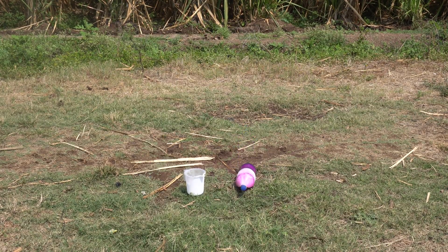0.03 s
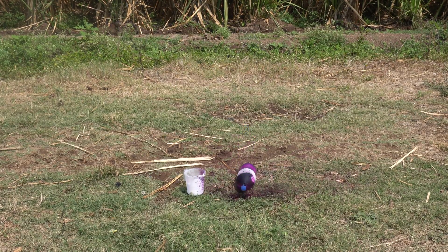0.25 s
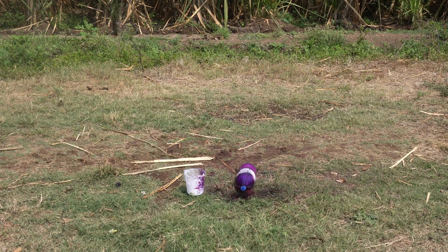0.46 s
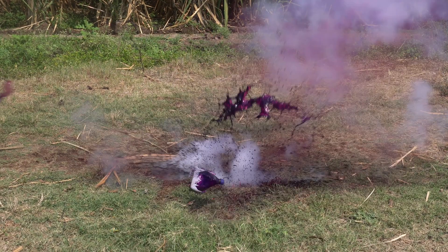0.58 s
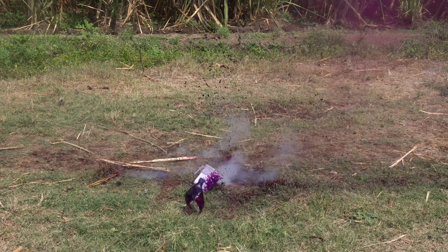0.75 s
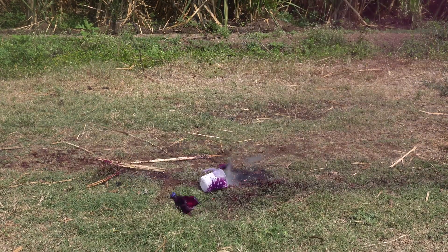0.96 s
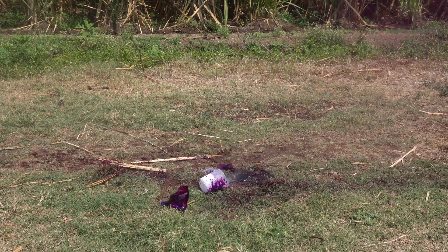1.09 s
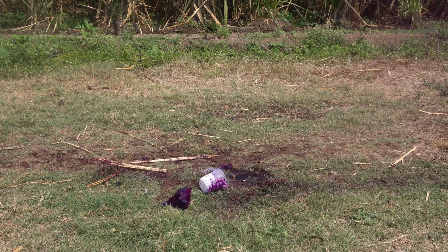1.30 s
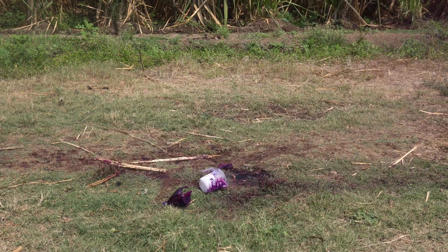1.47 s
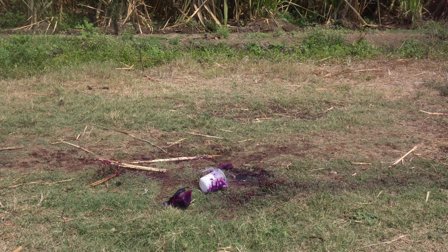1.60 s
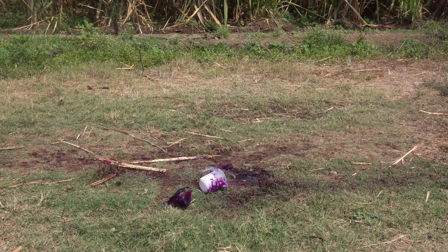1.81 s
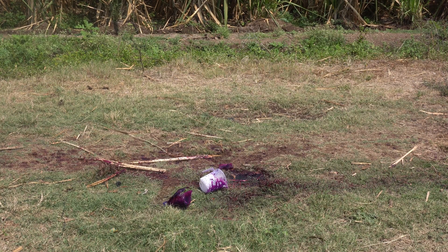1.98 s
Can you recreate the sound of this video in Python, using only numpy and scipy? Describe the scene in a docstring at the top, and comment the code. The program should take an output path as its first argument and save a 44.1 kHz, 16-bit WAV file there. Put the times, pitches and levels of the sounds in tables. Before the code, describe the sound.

Gas hisses, then a pressurized bottle explodes with a loud bang and boom in a field.

```python
"""A bottle under gas pressure lies on grass in an open field, one microphone close by.
It spits and leaks at the neck, pops, vents in a jet and then bursts. The bang overloads the
microphone, spray hisses out and echoes come back from the tall crop behind. Drops patter
on the dry grass and pieces thud down. A light wind rumbles on the microphone throughout."""
import sys
import numpy as np
from scipy import signal
from scipy.fft import rfft, irfft
from scipy.io import wavfile

SR = 44100
rng = np.random.default_rng(int(sys.argv[2]) if len(sys.argv) > 2 else 0)


def int16_out(signal):
    """Quantize to a 16-bit WAV file."""
    q = np.round(np.clip(np.atleast_2d(signal).T, -1, 1) * 32767)
    wavfile.write(sys.argv[1], SR, q.astype(np.int16))


N = 90404
TIME = np.arange(N) / SR
POP_S, BURST_S, CUTOFF_HZ = .1008, .6083, 15500

# Every _SPECTRUM is the shape of a noise: f/Hz, level/dB
# gas seeping at the neck: t/s, level/dB
LEAK_LEVEL = [(0, -55), (.04, -53), (.09, -48), (.115, -33), (.15, -37.5), (.2, -41.5), (.44, -33.5),
              (.5, -36.5), (.595, -35)]
LEAK_SPECTRUM = [(150, -6), (600, 3.5), (1800, 5), (4500, 3), (8000, -1), (15000, -3.5)]
# liquid spitting at the neck: t/s, level/dB, attack/s, hold/s, decay/s
NECK_SPITS = [(0, -38, 0.0016, 0.014, 0.037), (.0475, -29.5, 0.00053, 0.00091, 0.002),
              (.176, -34, 0.0094, .002, .004)]
SPIT_SPECTRUM = [(800, -23), (4200, 5), (6500, -5), (9000, 3), (11000, 2.5), (15000, -2)]
# hollow knock of the seal giving: f/Hz, level/dB, decay/s
SEAL_MODES = [(151, -23, 0.0025), (427, -17, 0.0034), (540, -26, 0.003), (1020, -12, 0.0012),
              (1500, -18, 0.0033)]
# gusts of gas from the neck: t/s, level/dB, attack/s, hold/s, decay/s
GAS_SPURTS = [(.1, -23.5, 0.00031, 0.0057, 0.0043), (.212, -16.5, 0.003, 0.0068, 0.018),
              (.411, -16.5, 0.0053, 0.0076, 0.0019), (.434, -24.5, 0.0018, 0.003, 0.0039)]
JET_SPECTRUM = [(40, -4), (170, -4), (400, -1), (700, -3), (1300, -0.5), (3000, -2), (5500, -7),
                (8500, -10), (15000, -14.5)]
TURBULENCE_SPECTRUM = [(25, 0), (70, -6.5), (170, 1.5), (300, -7.5), (700, -45)]
# slow pushes of air at the microphone: t/s, level/dB, f/Hz, decay/s
AIR_PUSHES = [(0.103, -27, 45, .006), (0.162, -25, 34.6, 0.029), (0.418, -18.5, 50, 0.014),
              (0.656, -4.5, 35.4, 0.03)]

# ringing of the burst bottle: f/Hz, level/dB, decay/s
BOTTLE_MODES = [(597.6, 14, 0.011), (478.4, 9.5, .011), (365.4, 4, 0.014), (724, 11.5, 0.0059)]
CRACK_SPECTRUM = [(100, -6.5), (550, 30), (900, 4), (5000, -0.5), (15000, -8)]
BANG_HISS_SPECTRUM = [(300, 6), (1000, 16), (3000, 25), (8000, -33), (15000, -21)]
GUSH_SPECTRUM = [(100, -23.5), (400, -6), (640, 0.5), (850, -9), (3000, -28), (8000, -62)]
BOOM_SPECTRUM = [(20, -9), (45, -11), (110, -24), (210, 4.5), (300, -4.5), (420, -1), (600, -8),
                 (1200, -42), (3000, -57.5)]
# cloud of spray: t/s, level/dB, attack/s, hold/s, decay/s
SPRAY_SWELLS = [(.641, -4, 0.0064, 0.01, 0.032), (.68, -16.5, 0.019, .12, 0.051)]
SPRAY_SPECTRUM = [(300, -0.5), (1200, 9), (3000, 0), (7500, -0.5), (10000, -4.5), (15000, -19.5)]

# returns from field and crop: t/s, level/dB, attack/s, hold/s, decay at 400 Hz/s
CROP_ECHOES = [(.612, -11, 0.0086, 0.15, 0.096), (.785, -10, 0.015, 0.042, 0.077)]
ECHO_SPECTRUM = [(40, -42), (85, -26), (125, -10.5), (195, 1.5), (300, -4.5), (420, -0.5), (1100, -10),
                 (2200, -23), (5000, -48), (15000, -55)]
# sharper echoes from the far edges of the field: t/s, level/dB, attack/s, hold/s, decay/s
EDGE_SLAPS = [(.818, -14.5, 0.0042, .002, 0.0096), (.992, -24, 0.012, 0.005, 0.043),
              (1.062, -29.5, 0.0067, 0.016, 0.061)]
SLAP_SPECTRUM = [(100, -1), (450, 10.5), (1300, -2), (5000, -14.5), (8000, -17), (15000, -54)]
ROLL_SPECTRUM = [(50, -3), (130, 5), (300, -7.5), (600, -11), (1300, -16.5), (3000, -27), (8000, -32.5),
                 (15000, -51)]

# large drops on dry grass: t/s, level/dB, top treble/dB
LARGE_DROPS = [(1.1253, -22, -10), (1.219, -37.5, 8), (1.258, -37.5, 5), (1.2875, -28.5, -4),
               (1.3198, -29, -5), (1.326, -32.5, -4), (1.4287, -40, 6), (1.5063, -30.5, 1),
               (1.577, -35.5, -1), (1.596, -38.5, -16), (1.6399, -33, 10), (1.6503, -39, 4),
               (1.671, -34, -12), (1.7012, -34.5, -16), (1.8356, -27.5, -3), (1.851, -33.5, -2),
               (1.888, -33.5, 1), (1.944, -32.5, 3)]
# base strength of the small drops: t/s, level/dB
PATTER_LEVEL = [(.8, -29.5), (1.3, -43), (1.47, -46.5), (1.9, -48), (2.05, -56)]
DROP_SPECTRUM = [(800, 6), (3000, -10.5), (7500, 4.5), (11000, -1), (15000, -3.5)]
# heavy pieces landing: t/s, level/dB, f/Hz, decay/s, scuff level/dB, scuff decay/s
PIECE_THUDS = [(1.288, -24.5, 109, 0.0057, -33, 0.049), (1.393, -20, 111, 0.008, -38, 0.0083),
               (1.442, -30, 533, 0.0073, -55, 0.0092), (1.494, -26, 120, 0.0062, -32.5, 0.02),
               (1.654, -23, 302, 0.006, -38, 0.0062), (1.66, -12, 87, 0.0098, -36.5, 0.04),
               (1.698, -20, 327, 0.0033, -38.5, 0.05)]
SCUFF_SPECTRUM = [(150, 8.5), (600, 5), (2500, -13.5), (8000, -55)]
# light plastic scraps landing: t/s, level/dB, f/Hz, decay/s
SCRAP_CLACKS = [(1.0685, -24.5, 1500, 0.004), (1.272, -32, 910, 0.0047), (1.3968, -29, 1080, .003),
                (1.482, -40.5, 1930, .004), (1.656, -43, 1300, 0.0026), (1.6995, -31.5, 920, 0.0025)]
GRIT_SPECTRUM = [(300, 0), (1800, 0), (10000, -36)]

# wind on the microphone and the open air around it: f/Hz, level/dB
WIND_SPECTRUM = [(15, -2), (35, -2.5), (120, -3.5), (220, -49), (600, -48.5)]
AIR_SPECTRUM = [(100, 8.5), (600, 4.5), (1200, 1.5), (2500, -8), (7500, -23), (15000, -43)]


def from_db(db):
    """Decibels to gain."""
    return 10 ** (np.asarray(db) / 20)


def level_curve(rows):
    """Gain along points of t/s, level/dB."""
    return from_db(np.interp(TIME, *np.transpose(rows)))


def noise(spectrum, low=0, high=np.inf):
    """Noise of rms 1 with the given spectrum, or its share between two frequencies."""
    hz, db = np.transpose(spectrum)
    f = np.arange(N // 2 + 1) * SR / N + 1e-3
    gain = from_db(np.interp(np.log(f), np.log(hz), db)) * (f > 10) * (f < CUTOFF_HZ)
    gain = gain / np.sqrt(np.mean(gain ** 2))
    return irfft(rfft(rng.standard_normal(N)) * gain * (f >= low) * (f < high), N)


def flutter(rate_hz, depth_db):
    """A gain that wanders at random."""
    pole = np.exp(-2 * np.pi * rate_hz / SR)
    slow = signal.lfilter([1], [1, -2 * pole, pole * pole], rng.standard_normal(N + SR))[SR:]
    return from_db(depth_db * slow / slow.std())


def swell(start, db, decay, attack=1 / SR, hold=0):
    """Straight rise to a level, hold, exponential release; times in seconds."""
    age = TIME - start
    return from_db(db) * np.clip(age / attack, 0, 1) * np.exp(-np.maximum(age - attack - hold, 0) / decay)


def swells(rows, stretch=1):
    """Overlapping swells added in power; stretch scales their decays."""
    return np.sqrt(sum(swell(start, db, decay * stretch, attack, hold) ** 2
                       for start, db, attack, hold, decay in rows))


def ring(start, db, hz, decay, attack=1 / SR):
    """One damped vibration."""
    return swell(start, db, decay, attack) * np.sin(2 * np.pi * hz * (TIME - start))


def burst():
    """The wall cracks and rings; gas churns through the split, then come spray and a low boom."""
    crack = swell(BURST_S, db=24, decay=.0029) * noise(CRACK_SPECTRUM)
    # a brief harsh hiss during the overloaded bang
    bang_hiss = swell(BURST_S, db=-5.5, hold=.019, decay=.0024) * noise(BANG_HISS_SPECTRUM)
    boom = swell(.64, db=-3.5, attack=.031, hold=.042, decay=.0047) * noise(BOOM_SPECTRUM)
    spray = swells(SPRAY_SWELLS) * noise(SPRAY_SPECTRUM)
    gush = swell(BURST_S, db=12, decay=.013) * noise(GUSH_SPECTRUM)
    # the pitch wavers as the bottle opens
    wavering_age = np.cumsum(flutter(120, depth_db=.6) * (TIME > BURST_S)) / SR
    body = sum(swell(BURST_S, db, decay) * np.sin(2 * np.pi * hz * wavering_age)
               for hz, db, decay in BOTTLE_MODES)
    return crack + bang_hiss + body + gush + boom + spray


def escaping_gas():
    """The neck leaks and spits, the seal pops, gas spurts and jets; air pushes at the microphone."""
    leak = level_curve(LEAK_LEVEL) * noise(LEAK_SPECTRUM) * flutter(110, depth_db=1.5) * (TIME < BURST_S)
    spits = swells(NECK_SPITS) * noise(SPIT_SPECTRUM)
    pop = sum(ring(POP_S, db, hz, decay) for hz, db, decay in SEAL_MODES)
    snap = swell(POP_S, db=-11, decay=.00043)
    jet_end_s, jet_shut_s = .403, .017
    shutting = np.exp(-np.maximum(TIME - jet_end_s, 0) / jet_shut_s)
    jet = swell(.2196, db=-8, attack=.026, decay=.11) * shutting
    flow = np.hypot(jet + snap, swells(GAS_SPURTS))
    rush = flow * noise(JET_SPECTRUM) * flutter(72, depth_db=1.72)
    # low flapping as the jet opens
    turbulence = swell(.212, db=-16, attack=.0056, decay=.034) * noise(TURBULENCE_SPECTRUM)
    pushes = sum(ring(*push, attack=.0015) for push in AIR_PUSHES)
    return leak + spits + pop + rush + turbulence + pushes


def field_echoes():
    """The bang comes back from crop and field edges, grainy, treble dying first, over a distant roll."""
    octave_edges_hz = 20 * 2.0 ** np.arange(11)
    returns = swells(EDGE_SLAPS) * noise(SLAP_SPECTRUM)
    for low, high in zip(octave_edges_hz, octave_edges_hz[1:]):
        returns += noise(ECHO_SPECTRUM, low, high) * swells(CROP_ECHOES, stretch=(400 / low) ** .19)
    roll = swell(BURST_S, db=-23.5, attack=.14, decay=.41) * noise(ROLL_SPECTRUM)
    # the far crop throws back the low note of the boom
    note = ring(.765, db=-14, hz=196, decay=.03, attack=.03)
    return returns * flutter(360, depth_db=2.5) + note + roll * flutter(100, depth_db=2)


def drops():
    """Many small drops tick on dry grass; each large one also leaves the struck blade shivering."""
    drops_per_s, spread_db, tick_decay_s, split_hz = 99, 3.5, .0007, 9500
    sizes = from_db(spread_db * np.minimum(rng.exponential(1, N), 3))
    hits = (rng.random(N) < drops_per_s / SR) * sizes * level_curve(PATTER_LEVEL) * (TIME > BURST_S)
    lower = upper = signal.lfilter([1], [1, -np.exp(-1 / (tick_decay_s * SR))], hits + 1e-18)
    for start, db, treble_db in LARGE_DROPS:
        tick = swell(start, db, tick_decay_s)
        rustle = swell(start, db - 13, decay=.005)
        lower = lower + tick + rustle
        upper = upper + (tick + rustle) * from_db(treble_db)
    return lower * noise(DROP_SPECTRUM, high=split_hz) + upper * noise(DROP_SPECTRUM, low=split_hz)


def falling_pieces():
    """Heavy pieces land with a dull thud and a scuff of grass, light scraps with a gritty clack."""
    thud_rise_s, clack_rise_s = .00337, .0012
    thuds = sum(ring(*thud[:4], thud_rise_s) for thud in PIECE_THUDS)
    scuffs = sum(swell(start, db, decay, thud_rise_s) for start, *_, db, decay in PIECE_THUDS)
    clacks = sum(ring(*clack, clack_rise_s) for clack in SCRAP_CLACKS)
    grit = sum(swell(start, db - 11, decay, clack_rise_s) for start, db, _, decay in SCRAP_CLACKS)
    return scuffs * noise(SCUFF_SPECTRUM) - thuds + clacks + grit * noise(GRIT_SPECTRUM)


def wind():
    """Light wind buffets the microphone over the quiet air of the field."""
    rumble = from_db(-41) * noise(WIND_SPECTRUM) * flutter(13, depth_db=1.5)
    return rumble + from_db(-54.5) * noise(AIR_SPECTRUM)


def scene():
    """The bottle nearby and the field beyond, at one microphone."""
    return (burst() + escaping_gas() + field_echoes() + drops() + falling_pieces() + wind())[None]


def limiter(x, threshold_db=-5, attack_s=.0087, release_db_per_s=22):
    """Turns the level down within milliseconds and lets it back slowly."""
    over_db = np.maximum(20 * np.log10(np.abs(x) + 1e-9) - threshold_db, 0)
    release_db = release_db_per_s * TIME
    held_db = np.maximum.accumulate(over_db + release_db, axis=-1) - release_db
    pole = np.exp(-1 / (attack_s * SR))
    return x * from_db(-signal.lfilter([1 - pole], [1, -pole], held_db))


def record(dry):
    """The microphone overloads, a limiter steps in, the treble has a dip and the top is cut."""
    overload, dip_hz, dip_depth = .88, 9970, .54
    limited = limiter(np.clip(dry, -overload, overload))
    notched = signal.lfilter(*signal.iirnotch(dip_hz, Q=5.2, fs=SR), limited)
    dipped = limited + dip_depth * (notched - limited)
    return signal.sosfilt(signal.ellip(12, .1, 80, CUTOFF_HZ, fs=SR, output="sos"), dipped)


dry = scene()
out = record(dry)
int16_out(out)
```